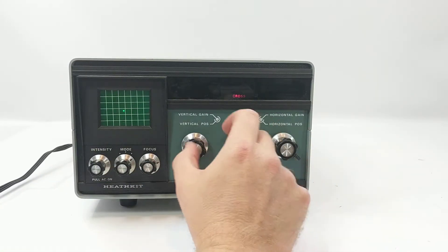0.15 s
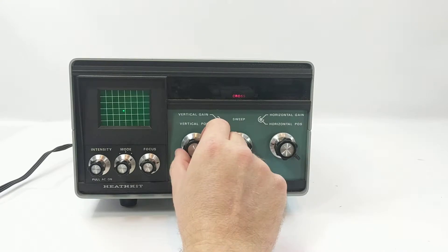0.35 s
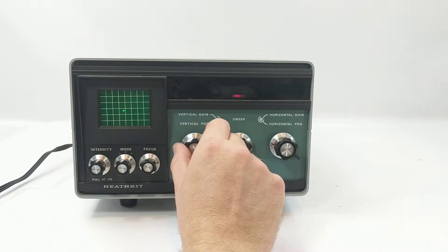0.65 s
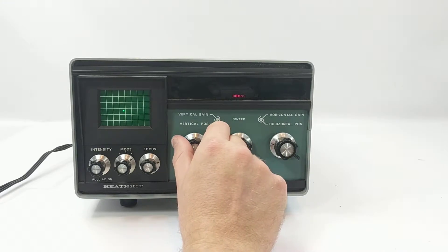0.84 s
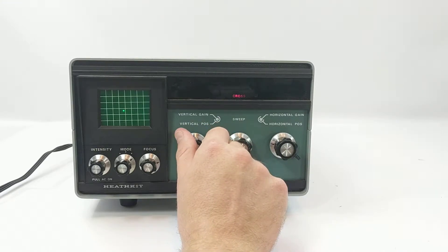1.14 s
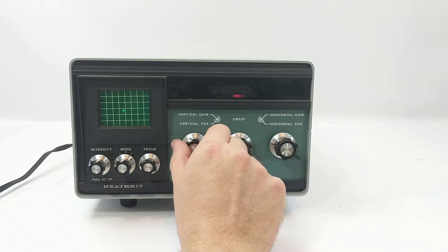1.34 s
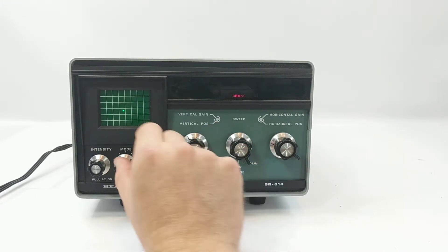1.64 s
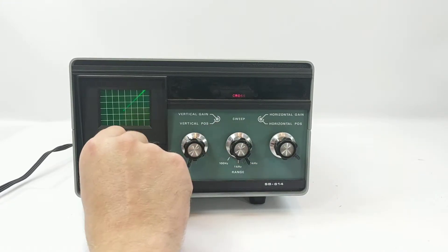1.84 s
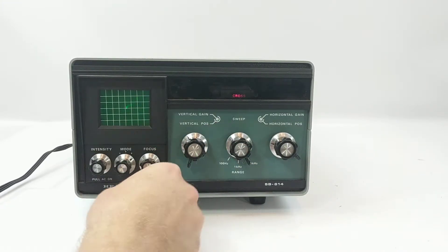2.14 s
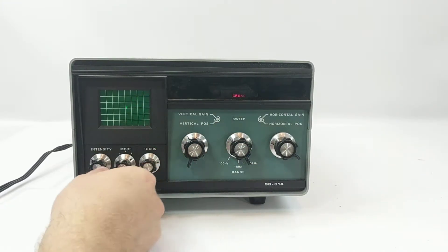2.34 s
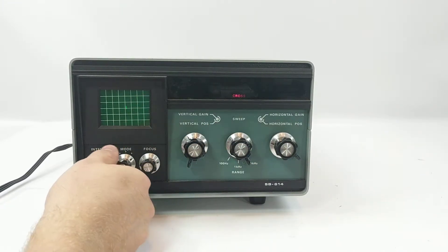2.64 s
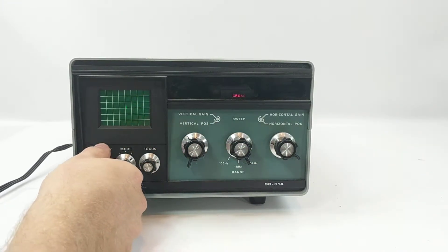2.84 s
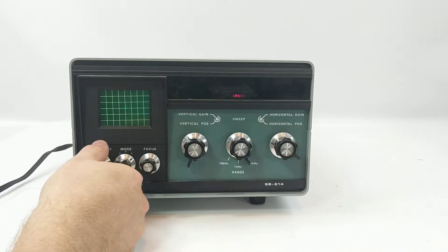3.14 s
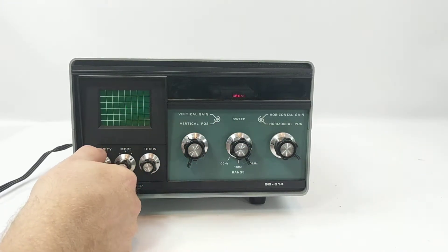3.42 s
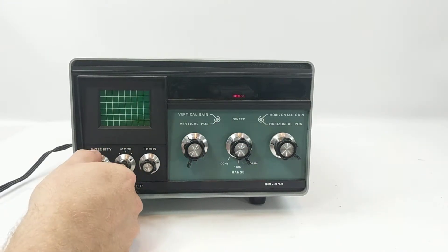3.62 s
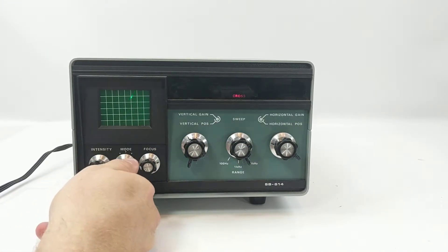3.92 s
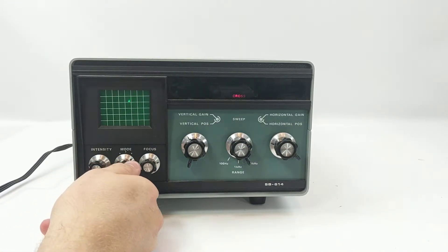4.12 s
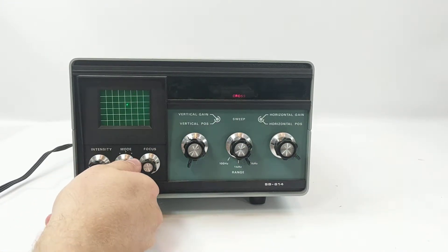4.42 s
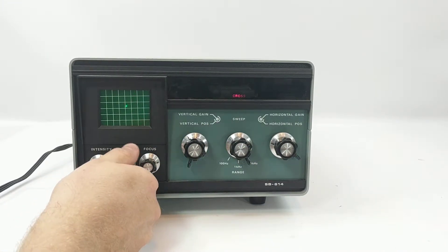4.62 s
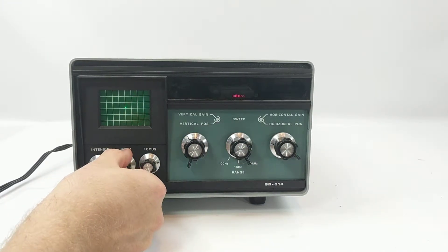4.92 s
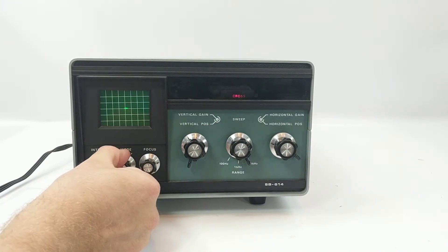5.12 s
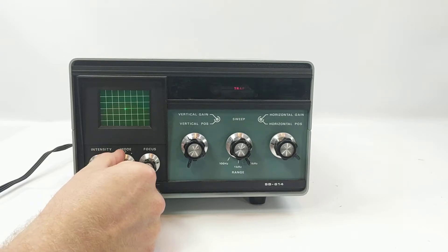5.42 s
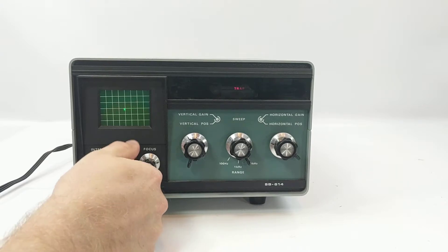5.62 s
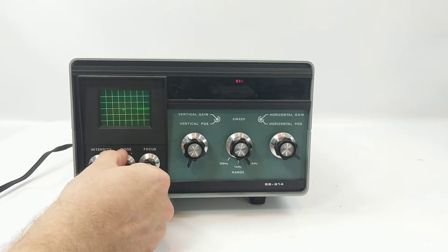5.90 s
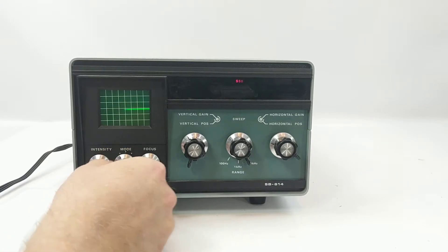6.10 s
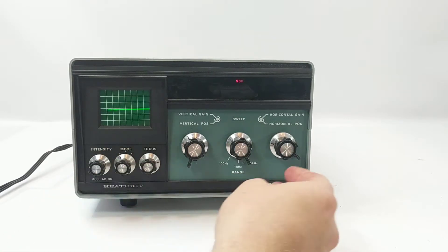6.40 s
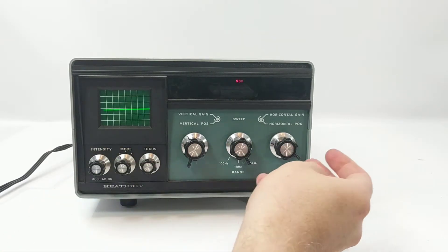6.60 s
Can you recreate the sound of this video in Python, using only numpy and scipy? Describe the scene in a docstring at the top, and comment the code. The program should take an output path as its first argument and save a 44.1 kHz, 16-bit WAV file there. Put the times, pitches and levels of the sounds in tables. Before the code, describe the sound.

A quiet indoor room with soft low rumble, a faint mains-like hum, light hiss and a very thin, wavering high whine from electronics. Two barely audible finger taps occur within the first 0.3 seconds. Near 1.7 a rub and tiny knocks precede the loudest event at 1.8: a hard, slightly chattering rotary-switch clack that rattles the sheet-metal case and dies quickly. Between 2.5 and 2.9 come several dull fingertip knocks, then a double bump at 3.4 leading straight into a strong, bright metallic snap at 3.5. The hand shifts faintly, with a slight low drone swell around 4.2 and tiny taps near 4.7. Two weaker clicks follow at 5.3 and 5.9, the first boxier and lower, the second a little stronger and drier. A short airy skin rub at about 6.0 marks the release; then only hum and slightly raised hiss remain until about 7 seconds.

```python
"""Rotary switches of a small bench oscilloscope snap from detent to detent in a quiet room: each blow is an
impact, a noisy crack with its room tail, and decaying sines for the modes of the sheet-metal cabinet.
Contacts slide just before and through each snap, as swells of grainy noise; between the snaps fingers knock
(the same cabinet, low-passed, with one rebound) and rub on the knobs (sliding noise).
Under it lie shaped noise for rumble and hiss, a low drone and hum, and a thin, slowly drifting whine."""
import sys
import numpy as np
from scipy import signal
from scipy.fft import rfft, irfft
from scipy.io import wavfile
from scipy.ndimage import uniform_filter1d

SR = 44100
rng = np.random.default_rng(int(sys.argv[2]) if len(sys.argv) > 2 else 0)


def materialize(psi):
    """Save the field psi as 16-bit PCM at rate SR to the path in sys.argv[1].

    A 1-D psi becomes a single channel; in a 2-D psi each row is a channel.
    """
    bounded = np.clip(np.atleast_2d(psi).T, -1, 1)
    quanta = np.round(bounded * 32767).astype(np.int16)
    wavfile.write(sys.argv[1], SR, quanta)


N = 297895
RING_SIZE = 18000  # samples computed for one blow

# Detent snaps: t/s, total energy/dB, energy of the first impact/dB, hold of the crack by contact chatter/s,
# t60 of the crack/s, room tail relative to the crack/dB
SNAPS = [(1.8277, 5.5, -12.5, .005, 0.045, -17), (3.4833, 2, -19.5, 0.001736, 0.071, -15.5),
         (5.3167, -10, -4.5, 0.00054, 0.067, -12), (5.8587, -8, -1, 0.0029, 0.1, -15.5)]


def undb(db):
    """Level definition: decibels to amplitude gain."""
    return 10 ** (np.asarray(db) / 20)


def level(x, db):
    """Mean power: scale a signal to an rms level."""
    return x * undb(db) / np.sqrt(np.mean(x ** 2))


def blow(x, db):
    """Signal energy: scale a transient to a total energy, the sum of its squares."""
    return x * undb(db) / np.sqrt(np.sum(x ** 2))


def curve(rows):
    """Linear interpolation: join (t/s, value) rows by straight lines."""
    return np.interp(np.arange(N) / SR, *np.transpose(rows))


def fade(t, t60):
    """Exponential damping: 60 dB down after t60."""
    return np.exp(-np.log(1000) * t / t60)


def swells(rows):
    """Amplitude modulation: a Gaussian rise of the gain for each (middle/s, width/s, rise/dB) row."""
    t = np.arange(N) / SR
    rise_db = sum(db * np.exp(-((t - s) / width_s) ** 2) for s, width_s, db in rows)
    return undb(rise_db)


def colour(x, points):
    """Minimum-phase filtering: a causal response to the (f/Hz, level/dB) spectrum, from its folded cepstrum."""
    size = 4096
    hz, db = np.transpose(points)
    f = np.maximum(np.arange(size // 2 + 1) * SR / size, 1)
    gain = undb(np.interp(np.log(f), np.log(hz), db))
    cepstrum = irfft(np.log(gain))
    # fold the negative times onto the positive ones
    cepstrum[1:size // 2] *= 2
    cepstrum[size // 2 + 1:] = 0
    response = irfft(np.exp(rfft(cepstrum)))
    return signal.fftconvolve(x, response)[:len(x)]


def band(x, low_hz, high_hz, order=2):
    """Band limitation: Butterworth band-pass."""
    top = min(max(high_hz, low_hz + 1), SR / 2 - 1)
    return signal.sosfilt(signal.butter(order, [low_hz, top], "band", fs=SR, output="sos"), x)


def narrow_noise(hz, width_hz):
    """Narrow-band noise: a wavering tone of rms 1."""
    noise = rng.standard_normal(N)
    return level(band(noise, hz - width_hz / 2, hz + width_hz / 2, order=1), 0)


def add(out, s, x):
    """Superposition: mix x into out from time s on."""
    i = max(int(s * SR), 0)
    out[i:i + len(x)] += x[:len(out) - i]


def background():
    """Stationary noise and tones: room rumble with a low drone and a wavering hum, and smooth hiss."""
    # spectra of the rumble and of the hiss: f/Hz, level/dB
    rumble_spectrum = [(13, -43), (22, -15.5), (38, -2.5), (99, 0), (144, -10.5), (223, -11.5),
                       (306, -15.5), (338, -5.5), (374, -18), (429, -9), (566, -11.5), (625, -15.5),
                       (858, -16), (1250, -20), (2500, -25.5), (3250, -49), (5500, -120)]
    hiss_spectrum = [(1470, -35.5), (2500, -12), (2580, -4), (2790, -4.5), (3080, -1), (3890, 0.5),
                     (5560, -7.5), (6110, -6), (6700, -11), (8940, -13), (11800, -6.5), (12800, -18.5),
                     (13700, -9), (15200, -10), (16000, -19)]
    # swells of the hiss and of the drone: middle t/s, width/s, rise/dB
    hiss_swells = [(.15, 0.19, 4.5), (4.5, 0.13, 3), (6.45, 0.77, 3)]
    drone_swells = [(4.2, .4, 9)]
    rumble = level(colour(rng.standard_normal(N), rumble_spectrum), -68.5)
    steady_hiss = level(colour(rng.standard_normal(N), hiss_spectrum), -76)
    steady_drone = level(np.sin(2 * np.pi * 50 * np.arange(N) / SR), -78.5)
    hum = undb(-76.5) * narrow_noise(116, 17)
    hum = hum + undb(-86.0) * narrow_noise(370, 10) + undb(-89) * narrow_noise(443, 10)
    return rumble + steady_hiss * swells(hiss_swells) + steady_drone * swells(drone_swells) + hum


def whine(jitter_hz=60):
    """Frequency modulation: electronics sing on a drifting, unsteady pitch, with a steadier line above it."""
    # slow drift of the pitch: t/s, f/Hz
    pitch = [(0.0, 6170), (5.49, 5737), (6.28, 6020), (6.75, 5950)]
    unrest = level(uniform_filter1d(rng.standard_normal(N), size=60), 0)
    phase = 2 * np.pi * np.cumsum(curve(pitch) + jitter_hz * unrest) / SR
    return level(np.sin(phase), -89.0) + undb(-87.0) * narrow_noise(11660, 110)


def slide(length_s, db, low_hz, high_hz, grain_db=4, grip_db=3):
    """Stick-slip friction: a short swell of dense micro-slips whose grip varies over a few milliseconds."""
    slips, sizes, grip = rng.standard_normal((3, RING_SIZE))
    grip = level(uniform_filter1d(grip, size=300), 0)
    swell = np.hanning(min(int(length_s * SR), RING_SIZE))
    grains = (slips * undb(grain_db * sizes + grip_db * grip))[:len(swell)]
    return level(band(grains * swell, low_hz, high_hz), db)


def wipers():
    """Sliding friction: wipers drag faintly before each snap; the spring skids off the cam's crest, louder."""
    drag_s, skid_s = .08, .016
    drag_lead_s = .014  # the middle of the drag lies this long before the snap
    stiffness = .45  # dB that both slides gain per dB of the snap: a stiffer spring presses harder
    out = np.zeros(N)
    for s, db, *_ in SNAPS:
        drag = slide(drag_s, -72.5 + stiffness * db, low_hz=500, high_hz=4500)
        skid = slide(skid_s, -59 + stiffness * db, low_hz=700, high_hz=4500)
        add(out, s - drag_lead_s - drag_s / 2, drag)
        add(out, s - skid_s / 2, skid)  # centred on the snap
    return out


def rubs():
    """Skin friction: fingers slide on the knobs as the hand takes hold and lets go."""
    # slides: middle t/s, half length/s, rms level/dB, lower edge f/Hz, upper edge f/Hz
    rub_rows = [(1.701, .09, -73, 600, 9900), (3.877, 0.051, -77.5, 2780, 6000),
                (5.135, 0.038, -75, 600, 4000), (5.768, 0.045, -76.5, 717, 1900),
                (5.998, .07, -73, 1000, 4000), (6.061, 0.034, -69, 1770, 14200)]
    out = np.zeros(N)
    for s, half_s, db, low_hz, high_hz in rub_rows:
        add(out, s - half_s, slide(2 * half_s, db, low_hz, high_hz))
    return out


def cabinet(switch, impact_db, chatter_s, crack_t60, room_db, ring_db):
    """Modal superposition: an impact, a crack of dense panel modes, its room tail, and clear modes of the case."""
    # cabinet modes: f/Hz, t60/s, relative spectral height/dB when struck at the range, power and mode switch
    modes = [(102.65, 0.53, 14, 13, 14), (131.8, 0.51, 7.5, 4, 11), (358, 0.35, 7, 12, -4),
             (403.2, 0.27, 8.5, -18, 4), (487.3, 0.17, 9, 24, 9.5), (547, 0.095, 0, 5, 4),
             (675, 0.25, 5.5, 6, 10.5), (731, 0.35, 5, -6, 13.5), (909, 0.17, 2.5, 4.5, 10.5),
             (1023, 0.24, 10.5, 7.5, 9), (1108, 0.14, -18, 4.5, 11), (1156, 0.039, 4.5, 12, 4.5),
             (1310, 0.15, -19.5, 3.5, -8), (1428, 0.26, 0.5, 8, 5), (1456, 0.084, 4.5, 9.5, 0),
             (1665, 0.077, -4.5, -17, -3), (1910, 0.074, -1.5, -11, -16), (2102, 0.073, 1, -6, -2),
             (2182, 0.16, -8.5, 5, 3), (2413, 0.059, 13.5, 11, 7.5), (2586, 0.1, -3.5, 13, 0),
             (2621, 0.1, 7.5, 9, 12), (3458, 0.06, 15, 12.5, 5), (3884, 0.1, 10, 13, 7),
             (4594, 0.12, 7.5, -11, -5), (6190, 0.11, 5, -1, -14), (6940, 0.1268, 3.5, -9, -14),
             (8460, 0.11, 5.5, 0, 6), (13160, 0.079, 11, 16.5, -5)]
    # decay of the room: f/Hz, t60/s, relative level of the tail/dB
    room = [(150, 0.38, 4.5), (598.7, 0.44, 1.5), (1813, .24, 3), (4500, 0.27, 0), (15430, 0.25, -8)]
    t = np.arange(RING_SIZE) / SR
    edges = np.geomspace(200, 20000, 9)
    room_hz, room_t60, tail_db = np.transpose(room)
    # the crack holds while the contacts chatter; the reflections build up a moment later
    crack = fade(np.maximum(t - chatter_s, 0), crack_t60)
    arrival = 1 - np.exp(-t / .005)
    out = blow(rng.standard_normal(RING_SIZE) * fade(t, .0077), impact_db)
    for low, high in zip(edges[:-1], edges[1:]):
        log_middle = np.log(low * high) / 2
        t60 = np.interp(log_middle, np.log(room_hz), room_t60)
        db = np.interp(log_middle, np.log(room_hz), tail_db)
        tail = undb(room_db + db) * arrival * fade(t, t60)
        # the second half of the noise is free of the filter's onset
        noise = band(rng.standard_normal(2 * RING_SIZE), low, high, order=4)[RING_SIZE:]
        part = np.hypot(crack, tail) * noise
        # near-equal energy per hertz, corrected by up to 2.5 dB for the density of the modes
        density = undb(np.interp(high, [350, 1200, 3500, 8000], [0.5, -2.5, -2.5, 0.5]))
        out = out + density * blow(part, 0) * np.sqrt(2 * (high - low) / SR)
    # the case takes the blow a moment after the first contact
    late = np.maximum(t - .4 * chatter_s, 0)
    for hz, t60, *height_db in modes:
        # the spectral peak of a damped sine grows with t60, so its amplitude is divided by t60
        strength = undb(ring_db + height_db[switch]) * 2 * np.log(1000) / (t60 * SR)
        out = out + strength * np.sin(2 * np.pi * hz * late) * fade(late, t60)
    return out


def knocks():
    """Contact stiffness: soft contacts ring the cabinet with less treble; the slack shaft rebounds once."""
    # knocks of fingers and loose shafts: t/s, energy/dB, low-pass edge f/Hz (the harder, the higher)
    knock_rows = [(0.0556, -35.5, 1200), (0.2665, -31.5, 900), (1.6721, -37, 2400), (1.6936, -33, 2300),
                  (2.5529, -25, 1130), (2.5908, -38, 4390), (2.7107, -23, 4400), (2.8332, -24, 1318),
                  (3.3894, -20, 1450), (3.409, -27.5, 2530), (3.6488, -37, 3400), (4.6785, -35, 3164),
                  (4.7774, -37.5, 2070), (5.555, -35, 3730), (6.0524, -38.5, 1490)]
    soft_hz, soft_low_hz = 1200, 515  # upper and lower edge of a soft fingertip knock
    thinning = 0.31  # octaves that the lower edge rises per octave of brightness
    rebound_s, rebound_db, rebound_loss_db = .0115, -0.5, 4  # delay, level when soft, loss per octave
    out = np.zeros(N)
    for s, db, high_hz in knock_rows:
        hardness = np.log2(high_hz / soft_hz)
        low_hz = soft_low_hz * 2 ** (thinning * hardness)
        ring = cabinet(1, impact_db=-10.0, chatter_s=.002, crack_t60=0.0571, room_db=-15.0, ring_db=-6.5)
        soft = signal.sosfilt(signal.butter(4, high_hz, fs=SR, output="sos"), ring)
        knock = signal.sosfilt(signal.butter(2, low_hz, "high", fs=SR, output="sos"), soft)
        add(out, s, blow(knock, db))
        rebound = band(knock, 396, 620, order=1)
        add(out, s + rebound_s, blow(rebound, db + rebound_db - rebound_loss_db * hardness))
    return out


def small_parts(t, t60, height_db, count=80):
    """High modal density: springs, wafers and knob caps tinkle in many modes, drawn anew at each blow."""
    hz = rng.uniform(2800, 15500, (count, 1))
    sizes = rng.standard_normal((count, 1))
    tinkle = np.sum(sizes * np.sin(2 * np.pi * hz * t), axis=0)
    strength = undb(height_db) * 2 * np.log(1000) / (t60 * SR)
    return strength * fade(t, t60) * tinkle


def detents():
    """Impulsive excitation: the spring drives each switch into its next notch and shakes the cabinet."""
    # switch behind each snap: 0 range, 1 power, 2 mode
    snap_switch = [0, 1, 2, 2]
    # colour of the four snaps: f/Hz, then level/dB of range switch, power switch, mode switch up, mode switch down
    colours = np.array([(69.8, -29.5, -34, 4, -5), (109, -22, -8, 4, -7.5), (194, -18, -27, -6, -7),
                        (302, -18.5, -18, -8.5, -21), (443.5, -4.5, -14.5, 4, 2.5),
                        (740, -4, -8, -7.5, -11), (980, -4, -2.5, -11, -14.5), (2195, -3.5, 0, -6, -10.5),
                        (2926, -16.5, -5.5, -15.5, -21.5), (3610, -15.5, -1, -18.5, -20.5),
                        (6018, -12, -4.5, -14.5, -17.5), (8400, -15.5, -8, -11, -16),
                        (10500, -21, -5.5, -21, -24), (15020, -19.5, -5.5, -20, -31)])
    out = np.zeros(N)
    for k, (s, db, impact_db, chatter_s, t60, room_db) in enumerate(SNAPS):
        ring = cabinet(snap_switch[k], impact_db, chatter_s, t60, room_db, ring_db=-1.5)
        ring = ring + small_parts(np.arange(RING_SIZE) / SR, t60=.11, height_db=-0.5)
        coloured = colour(ring, colours[:, [0, k + 1]])
        add(out, s, blow(coloured, db))
    return out


def scene():
    """Superposition: all sources add up at one microphone in front of the bench."""
    return (background() + whine() + wipers() + rubs() + knocks() + detents())[None]


def record(dry):
    """Band limitation: the recorder thins the deepest bass and cuts the top steeply."""
    thinned = signal.sosfilt(signal.butter(3, 36, "high", fs=SR, output="sos"), dry)
    return signal.sosfilt(signal.ellip(10, .2, 70, 15900, fs=SR, output="sos"), thinned)


dry = scene()
out = record(dry)
materialize(out)
```